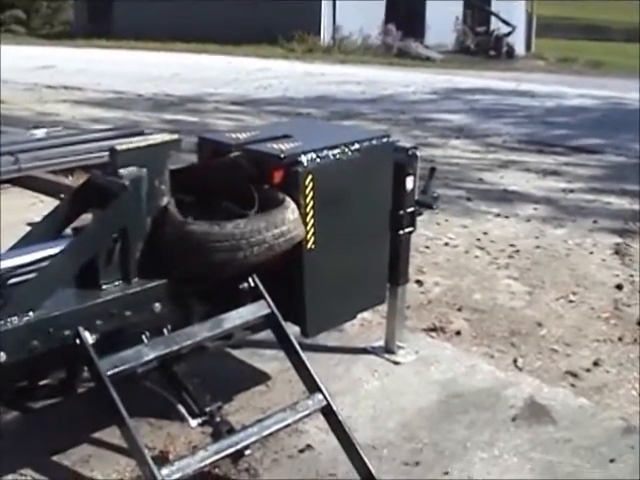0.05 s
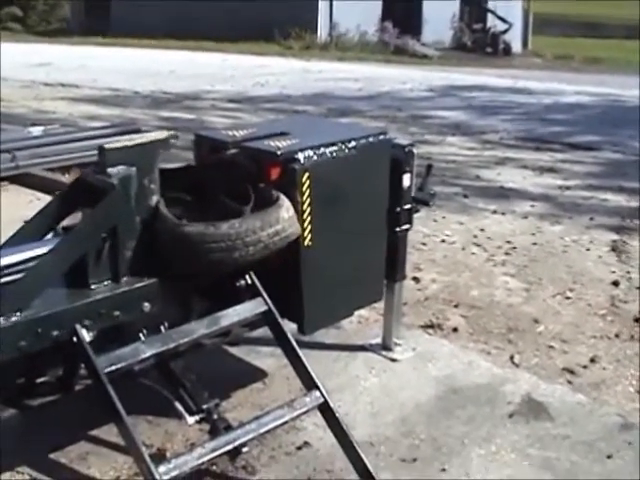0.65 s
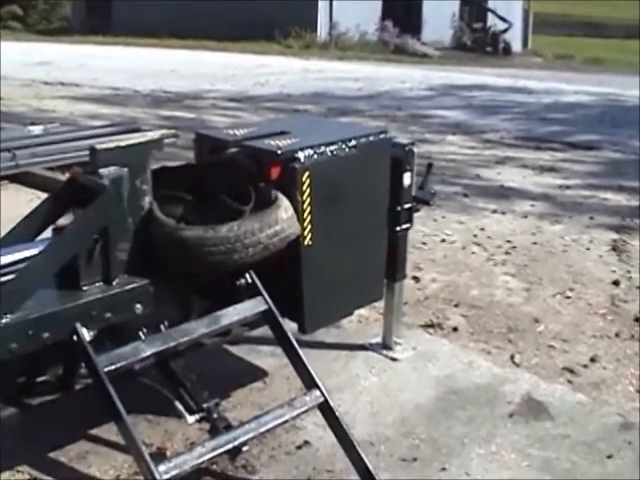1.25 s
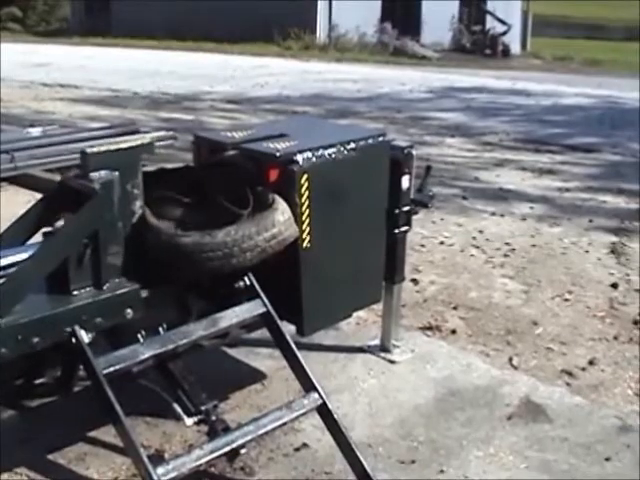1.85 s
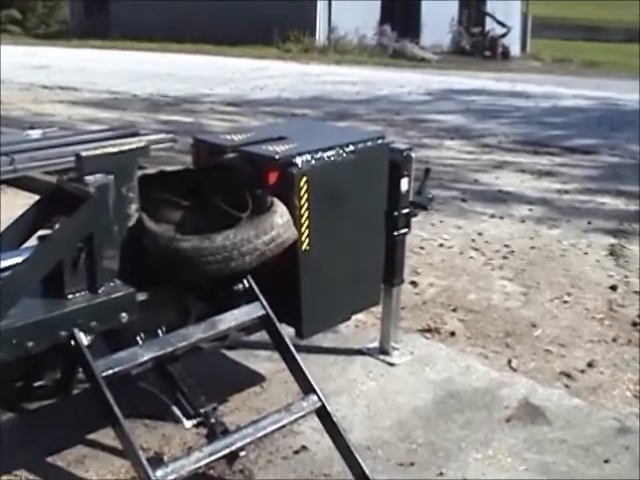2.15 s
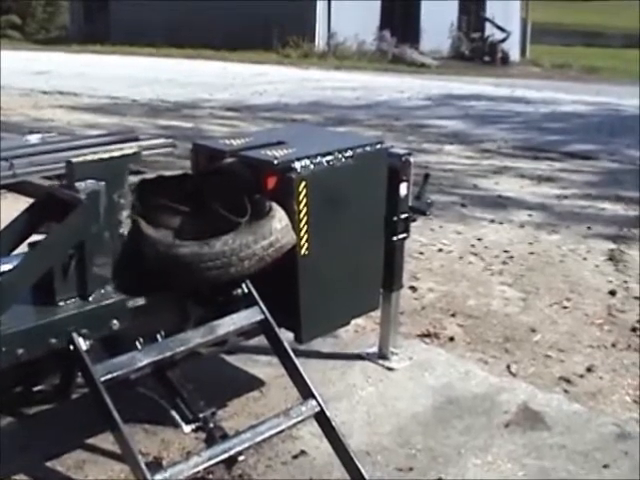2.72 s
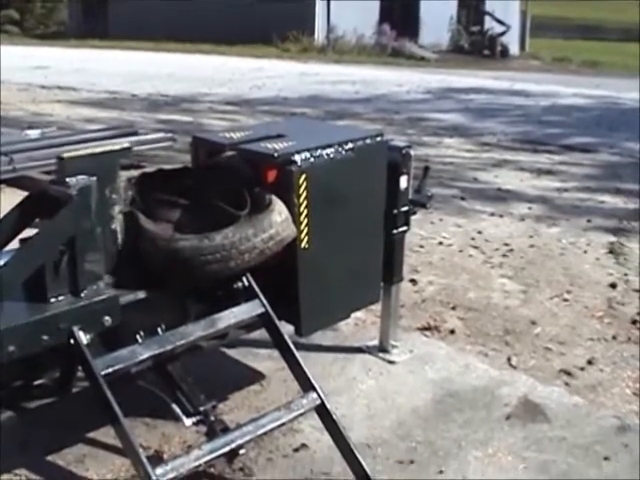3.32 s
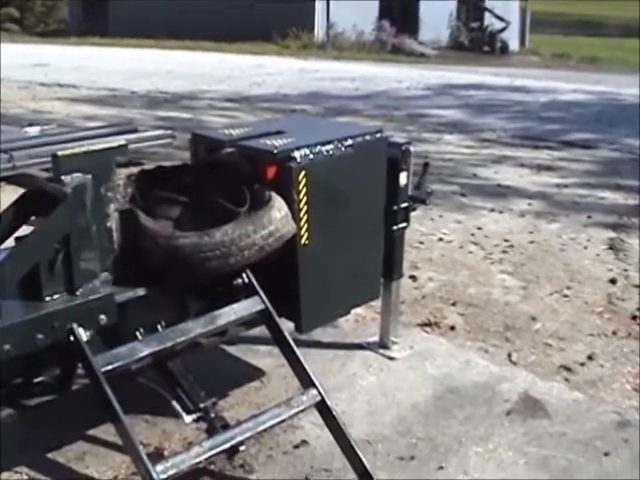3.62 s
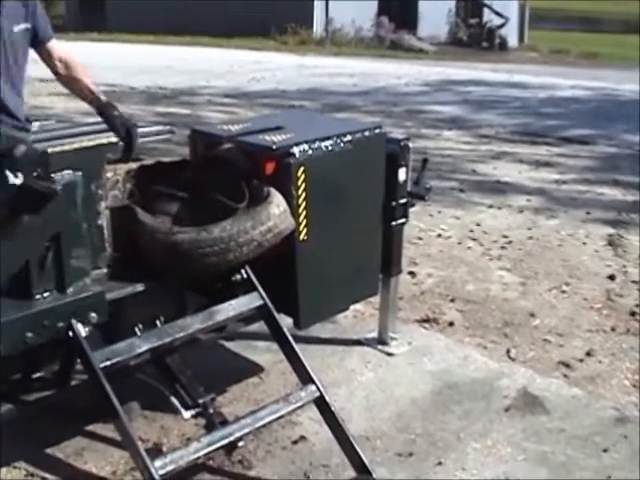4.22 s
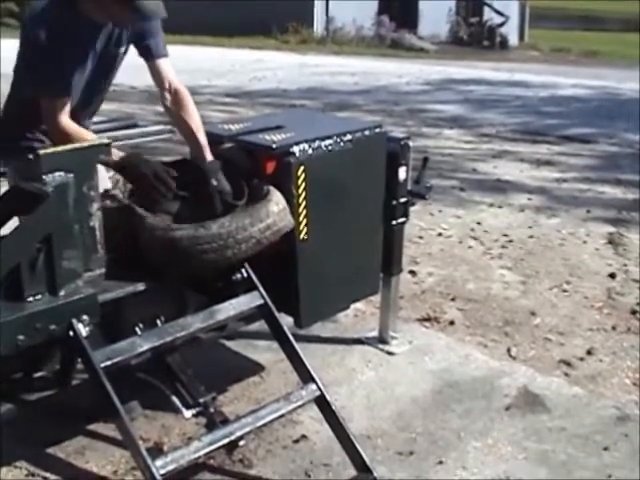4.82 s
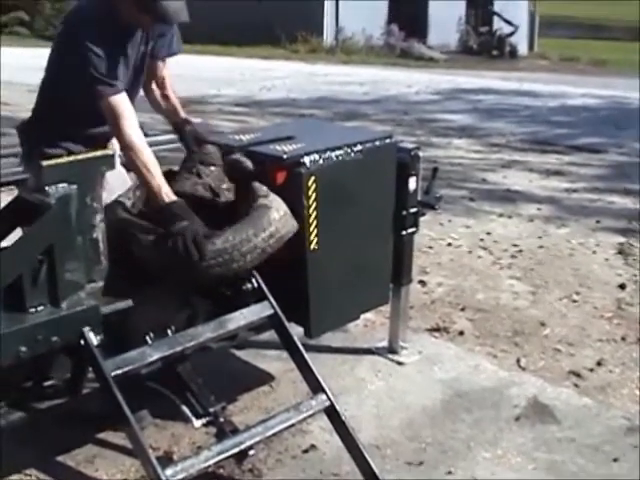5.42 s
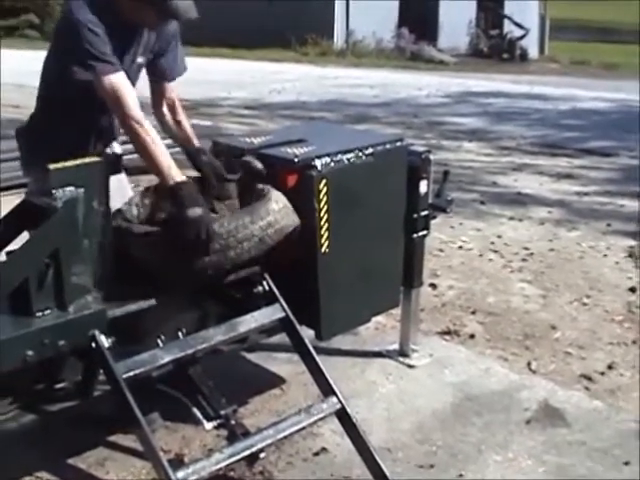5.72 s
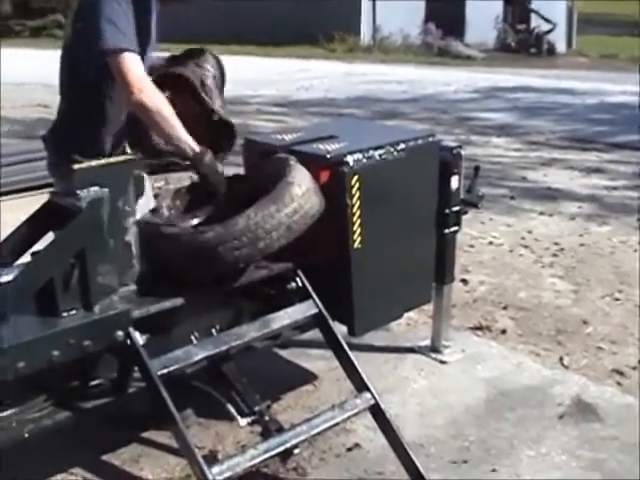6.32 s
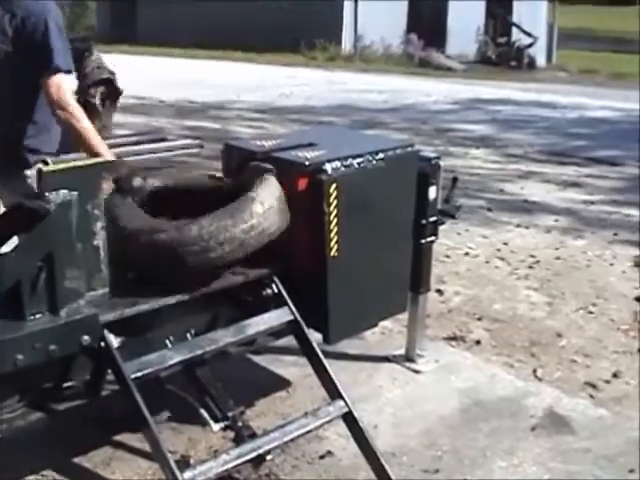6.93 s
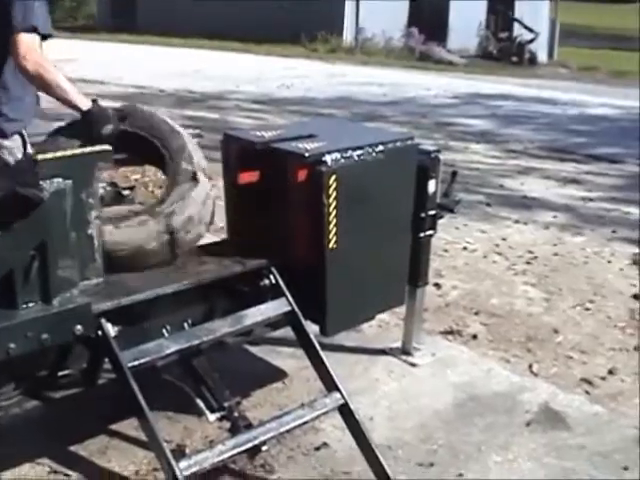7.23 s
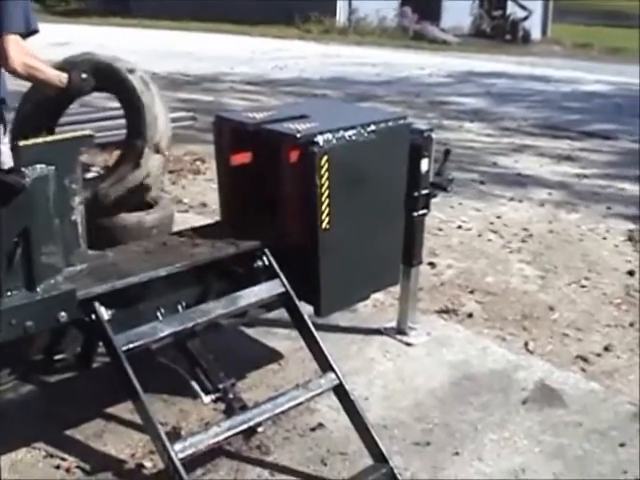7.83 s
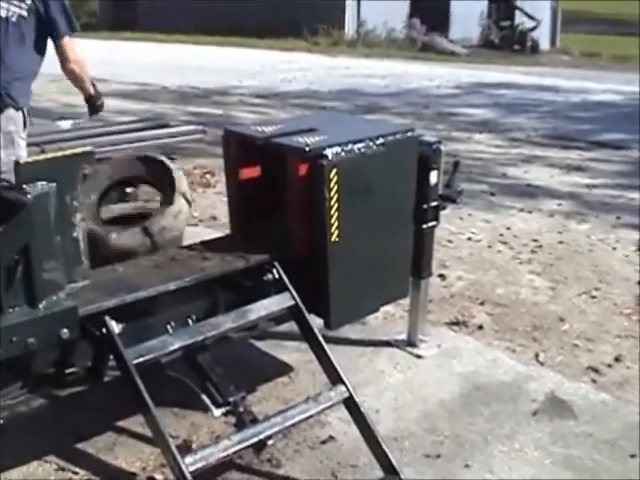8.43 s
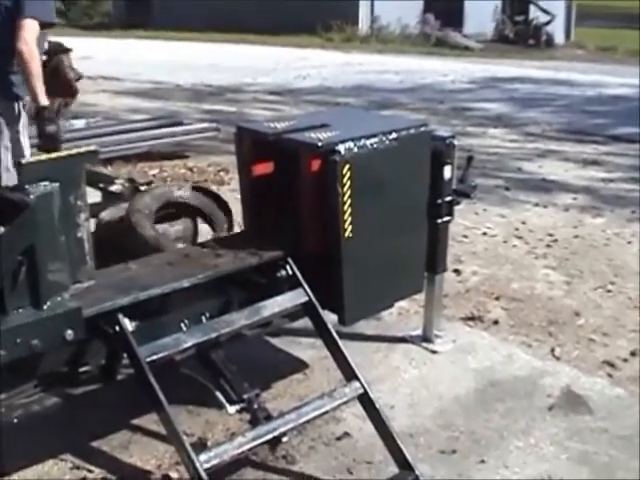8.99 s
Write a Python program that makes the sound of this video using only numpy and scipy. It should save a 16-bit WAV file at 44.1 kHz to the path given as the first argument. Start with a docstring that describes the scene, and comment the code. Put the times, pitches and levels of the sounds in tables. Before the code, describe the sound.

The engine of a hydraulic machine runs at a steady, fairly fast speed in an open yard. A low exhaust drone sits under rapid knocking, rattling metal covers and fine valve clatter, with a cooling fan humming in a rush of air. The sound starts loud and fades evenly until it is almost gone, never changing pitch. The microphone is close by, in mono, with no echo.

```python
"""An open paved yard, with one microphone standing by a hydraulic power unit: mono, no echoes.
Its four-cylinder engine runs at a governed speed of about 2115 rpm. At the back the cooling fan
hums in a rush of air; in front the exhaust drones, and every firing knocks the block, rattles its
covers and sets injectors and valve gear clattering. The whole sound fades out evenly."""
import sys
import numpy as np
from scipy import signal
from scipy.fft import rfft, irfft, next_fast_len
from scipy.io import wavfile
from scipy.ndimage import uniform_filter1d, map_coordinates

SR = 44100
rng = np.random.default_rng(int(sys.argv[2]) if len(sys.argv) > 2 else 0)


def inscribe(sig):
    """Save sig as 16-bit PCM at rate SR to the path in sys.argv[1].

    A 1-D sig is mono; a 2-D sig holds one channel per row.
    Samples are clipped to [-1, 1] before scaling.
    """
    pcm = np.round(np.clip(np.atleast_2d(sig).T, -1, 1) * 32767)
    wavfile.write(sys.argv[1], SR, pcm.astype(np.int16))


N = 399546

# the governor holds the engine near one speed: (time [s], crank speed [turns/s])
CRANK_SPEED = [(0, 35.284), (1.7, 35.214), (3.2, 35.285), (7.5, 35.216), (9, 35.21)]
# cylinders in firing order: (lateness [firing intervals], relative level [dB], base ring-out [s])
CYLINDERS = [(0.063, 0, 0.0083), (0.059, 0.5, 0.0078), (0.12, -2, 0.0077), (0.048, 0, 0.0053)]
CYCLE_HZ = np.mean(np.array(CRANK_SPEED)[:, 1]) / 2   # one engine cycle takes two crank turns


def from_db(db):
    """Decibels to gain."""
    return 10 ** (np.asarray(db) / 20)


def unit_rms(x):
    """Scale to unit power."""
    return x / np.sqrt(np.mean(x ** 2) + 1e-20)


def level_at(spectrum, hz):
    """Read a spectrum's level in dB on a log-frequency axis."""
    known_hz, level_db = np.transpose(spectrum)
    return np.interp(np.log(np.maximum(hz, 1)), np.log(known_hz), level_db)


def drift(rate):
    """A smooth random wander of unit rms that changes about rate times a second."""
    hop, settle = 40, 2000
    pole = np.exp(-2 * np.pi * rate * hop / SR)
    noise = rng.standard_normal(N // hop + settle + 2)
    slow = signal.lfilter([1], [1, -2 * pole, pole * pole], noise)[settle:]
    return np.interp(np.arange(N) / hop, np.arange(len(slow)), unit_rms(slow))


def block_db(hz):
    """Lift that the resonances of the block and its covers give to each frequency."""
    # resonances: (centre [Hz], width [Hz], lift [dB])
    modes = [(890, 69, 3), (1240, 340, 3), (1520, 39, 5.5), (1698, 180, 4), (2000, 127, 4.5),
             (2376, 45, 6.5), (2637, 96, 5), (2895, 130, 4), (4200, 41, 3), (5120, 380, 4), (6170, 490, 4),
             (8470, 260, 3.5)]
    return sum(lift_db / (1 + (2 * (hz - centre) / width) ** 2) for centre, width, lift_db in modes)


def colour(white, spectrum):
    """Give a white signal of unit power a spectrum in dB per Hz, plus the block's resonances."""
    size = next_fast_len(N)
    hz = np.arange(size // 2 + 1) * SR / size
    gain = from_db(level_at(spectrum, hz) + block_db(hz)) * np.sqrt(SR / 2)
    return irfft(rfft(white, size) * gain, size)[:N]


def crank_turns(hunt_turns=0.003, first_firing_turns=0.36):
    """Crank angle in turns, running a little ahead or behind as the governor hunts."""
    speed = np.interp(np.arange(N) / SR, *np.transpose(CRANK_SPEED))
    turns = np.cumsum(speed) / SR + hunt_turns * drift(1.5)
    return turns + 2 - first_firing_turns


def firing_envelope(cycles, rise_s, ring_scale):
    """Each cylinder's blow swells quickly and rings out, once in two crank turns."""
    blows = 0
    for k, (late, level_db, ring_s) in enumerate(CYLINDERS):
        age = (cycles - (k + late) / len(CYLINDERS)) % 1 / CYCLE_HZ
        swell = 1 - np.exp(-age / rise_s)
        blows += from_db(level_db) * swell * np.exp(-age / (ring_s * ring_scale))
    return unit_rms(blows)


def per_firing(cycles):
    """A fresh random value for each firing, joined smoothly."""
    firing = (cycles * len(CYLINDERS)).astype(int)
    return uniform_filter1d(rng.standard_normal(N // 100)[firing], size=64)


def fan(turns, blades_per_turn=7.5603, hum_db=-35.5, flutter_db=0.75, sway_rad=0.082):
    """The belt-driven fan hums in the turbulent air that it pushes through the radiator."""
    # rush of cooling air and exhaust gas: (frequency [Hz], density before the block's lift [dB/Hz])
    rush = [(20, -88), (45, -81), (110, -72), (200, -65), (330, -65), (480, -67.5), (700, -62.5),
            (1100, -68), (1700, -65.5), (2700, -67), (4300, -74), (6500, -87.5), (9000, -84.5),
            (14500, -110)]
    hum = np.sqrt(2) * np.sin(2 * np.pi * blades_per_turn * turns + sway_rad * drift(5.5))
    hum *= from_db(hum_db + flutter_db * drift(6.2))
    return hum + colour(rng.standard_normal(N), rush)


def clatter(cycles, uneven_db=1.0, grain_db=0.6):
    """Injectors and valve gear: each firing shakes loose a burst of tiny metal contacts."""
    # metal contacts: (frequency [Hz], density before the block's lift [dB/Hz])
    contacts = [(100, -79), (400, -78), (900, -72), (1800, -75.5), (2700, -73), (3600, -69.5), (4500, -75),
                (5700, -75.5), (7000, -75.5), (8600, -85), (11000, -93), (14500, -108)]
    bursts = firing_envelope(cycles, rise_s=0.00093, ring_scale=0.92)
    bursts *= from_db(uneven_db * per_firing(cycles) + grain_db * drift(300))
    return colour(unit_rms(bursts * rng.standard_normal(N)), contacts)


def cover_rattle(cycles, uneven_db=2.5, swell_db=3.0):
    """Each cover is shaken by every firing, now harder, now softer, and rings at its own pitch."""
    # loose covers: (pitch [Hz], width [Hz], level [dB rms], lag [firing intervals])
    covers = [(918, 140, -41.5, 0.1), (1173, 150, -37.5, 0.064), (1726, 330, -37, 0.354),
              (2760, 660, -38.5, 0.19)]
    rattle = 0
    for hz, width_hz, level_db, lag in covers:
        shaken = cycles + 1 - lag / len(CYLINDERS)
        force = firing_envelope(shaken, rise_s=0.00085, ring_scale=0.87)
        force *= from_db(uneven_db * per_firing(shaken) + swell_db * drift(6.2))
        radius = np.exp(-np.pi * width_hz / SR)
        resonator = [1, -2 * radius * np.cos(2 * np.pi * hz / SR), radius * radius]
        ring = signal.lfilter([1, 0, -1], resonator, force * rng.standard_normal(N))
        # soft contacts carry little treble
        ring = signal.sosfilt(signal.butter(2, 1.33 * hz, fs=SR, output="sos"), ring)
        rattle += from_db(level_db) * unit_rms(ring)
    return rattle


def knock_phases(size=2048, gear_share=0.88, gear_top_hz=2800, swell_s=0.0015):
    """Unit-size harmonics of one cycle: sharp firings, ringing panels and the running gear's churn."""
    # panels that ring once a cycle: (start [cycles], pitch [Hz], ring-out [s], strength [relative])
    panels = [(0.01, 924, 0.0037, 2.4), (.26, 918, 0.0043, 1.4), (.51, 920, .003, 1.6),
              (.76, 918, 0.0042, 1.0), (.06, 1765, 0.0039, 2.02), (.81, 1765, .004, 1.3),
              (.76, 1142, 0.0022, 2.67)]
    place = np.arange(size) / size
    blows = rng.standard_normal(size) * firing_envelope(place, rise_s=0.00066, ring_scale=0.96)
    for start, hz, ring_s, strength in panels:
        age = (place - start) % 1 / CYCLE_HZ
        # each panel's ring swells in softly, keeping its ping close to its pitch
        swell = 1 - np.exp(-age / swell_s)
        blows += strength * swell * np.exp(-age / ring_s) * np.sin(2 * np.pi * hz * age)
    line_hz = np.arange(size // 2 + 1) * CYCLE_HZ
    churn = gear_share * rfft(rng.standard_normal(size)) / (1 + (line_hz / gear_top_hz) ** 4)
    return np.exp(1j * np.angle(rfft(blows) + churn))


def play_cycle(lines, cycles):
    """Repeat one cycle, given as rms harmonics, in step with the crank."""
    wave = irfft(lines) * (len(lines) - 1) * np.sqrt(2)
    return map_coordinates(wave, [cycles % 1 * len(wave)], order=3, mode="grid-wrap")


def engine(cycles, jitter_s=0.00003, uneven_db=0.62, wander_rad=0.33, scatter_db=3.0):
    """The exhaust drones on the low orders; above them the block knocks, never quite the same twice."""
    # strong lines of exhaust and block: (order [multiple of crank speed], level [dB rms])
    orders = [(2.0, -28.0), (4.0, -40.8), (6.0, -29.7), (6.5, -49.8), (8.5, -50.2), (9.5, -50.0),
              (10.0, -48.7), (10.5, -49.7), (11.5, -46.8), (12.0, -40.1), (14.0, -48.5), (15.0, -47.9),
              (16.0, -49.5), (17.0, -41.3), (18.0, -41.5), (19.5, -42.3), (23.0, -39.2), (24.0, -38.0),
              (25.5, -40.1), (26.0, -32.2), (27.0, -40.4), (28.0, -38.2), (31.0, -39.6), (31.5, -41.9),
              (32.0, -39.7), (33.5, -42.4), (34.0, -38.9), (36.0, -40.6), (50.0, -38.8)]
    # all other lines of the knock: (frequency [Hz], level a line before lift and scatter [dB rms])
    knock_spectrum = [(18, -82), (60, -86), (120, -63), (330, -55), (480, -57), (700, -53.5), (1150, -50.5),
                      (1900, -51.5), (2200, -54.5), (2800, -60.5), (3300, -58), (4500, -72), (6600, -65.5),
                      (12000, -99)]
    phases, other_phases = knock_phases(), knock_phases()
    hz = np.arange(len(phases)) * CYCLE_HZ
    # countless narrow modes favour some lines over their neighbours
    scatter = rng.uniform(-1, 1, len(hz))
    scatter = unit_rms(scatter - uniform_filter1d(scatter, size=5))
    ring_gains = from_db(level_at(knock_spectrum, hz) + block_db(hz) + scatter_db * scatter)
    strong_gains, exhaust = np.zeros(len(hz)), 0
    exhaust_cycles = cycles + 0.04 / len(CYLINDERS)   # slightly ahead of the firings
    for order, level_db in orders:
        line = round(2 * order)
        ring_gains[line] = 0
        if line <= 3 * len(CYLINDERS):   # the first three harmonics of the firing rate
            exhaust += from_db(level_db) * np.sqrt(2) * np.sin(2 * np.pi * line * exhaust_cycles)
        else:
            strong_gains[line] = from_db(level_db)
    timing = cycles + jitter_s * CYCLE_HZ * per_firing(cycles)   # ignition comes early or late
    blend = wander_rad * drift(0.95)   # the ring slowly changes colour
    ring = np.cos(blend) * play_cycle(phases * ring_gains, timing)
    ring += np.sin(blend) * play_cycle(1j * other_phases * ring_gains, timing)
    knock = play_cycle(phases * strong_gains, timing) + ring
    exhaust *= from_db(0.3 * drift(4.3))
    return exhaust + knock * from_db(uneven_db * per_firing(cycles))


def scene():
    """The unit at the microphone, from a steady distance: everything turns with the crankshaft."""
    turns = crank_turns()
    cycles = turns / 2
    return (engine(cycles) + clatter(cycles) + cover_rattle(cycles) + fan(turns))[None]


def record(dry, silent_at_s=9.584, cutoff_hz=14800):
    """The microphone's channel: a straight fade towards silence and a steep cut of the top treble."""
    fade = np.clip(1 - np.arange(N) / SR / silent_at_s, 0, 1)
    low_pass = signal.ellip(12, 0.1, 90, cutoff_hz, fs=SR, output="sos")
    return signal.sosfilt(low_pass, dry * fade)


dry = scene()
out = record(dry)
inscribe(out)
```